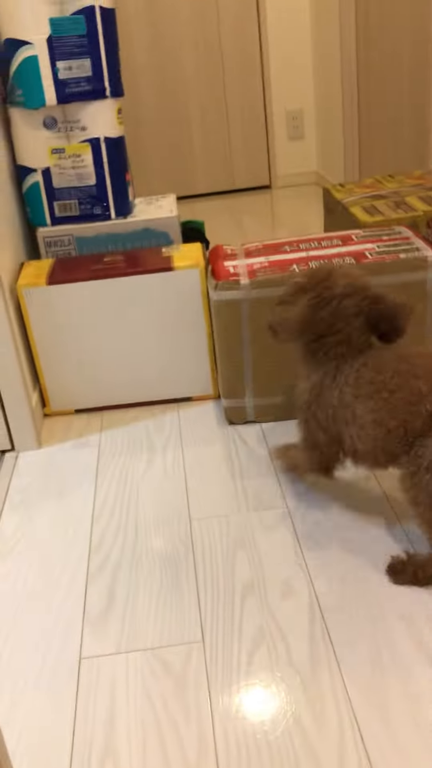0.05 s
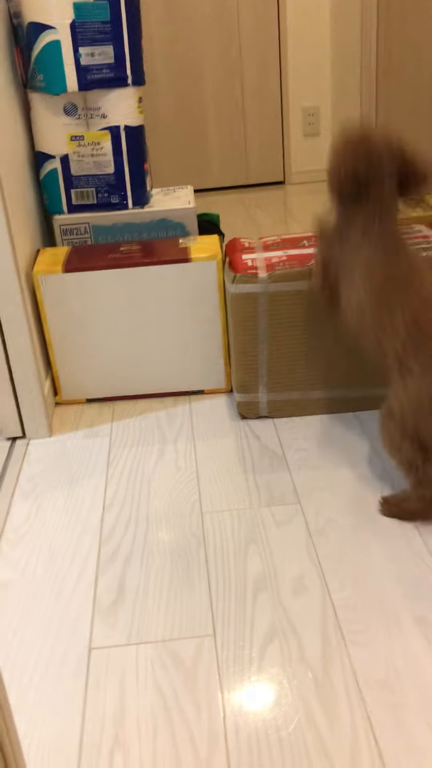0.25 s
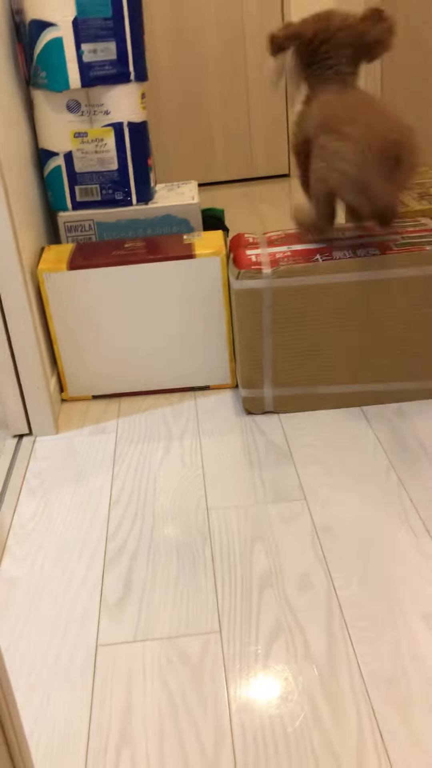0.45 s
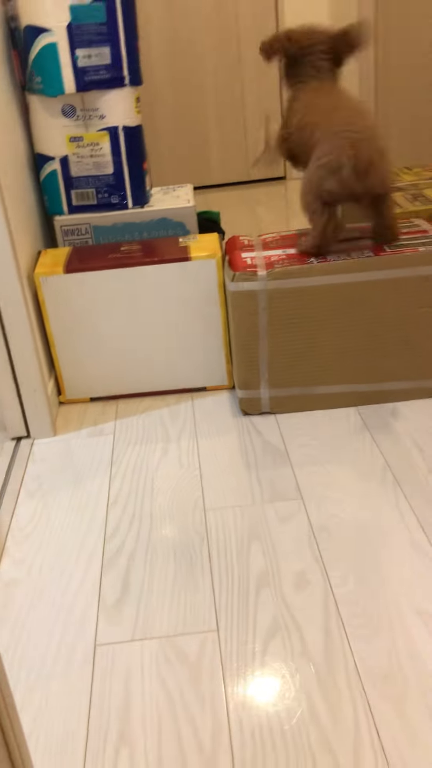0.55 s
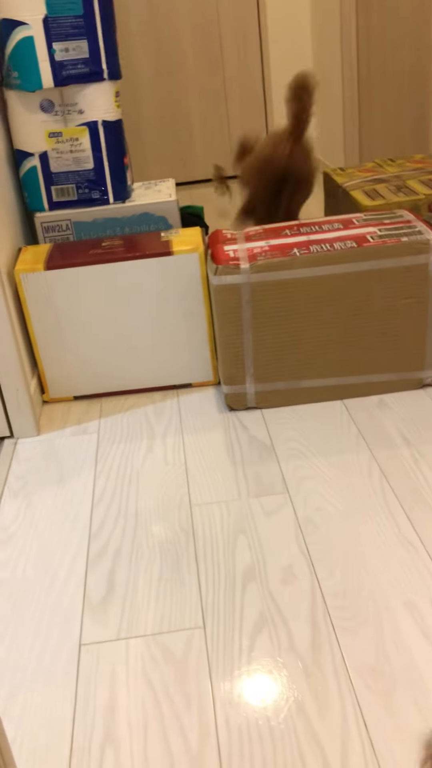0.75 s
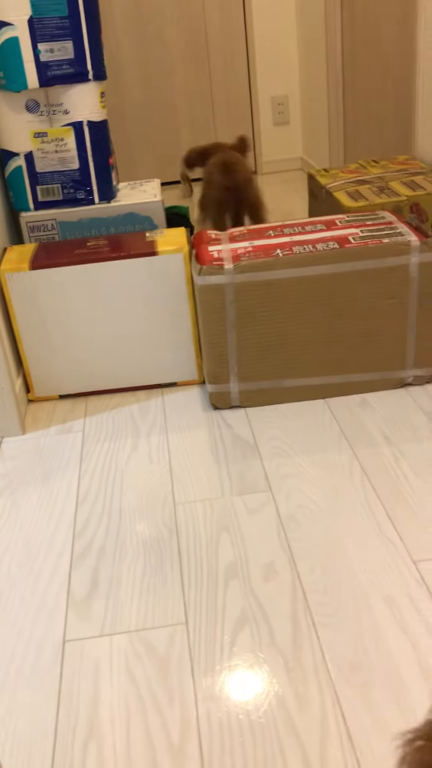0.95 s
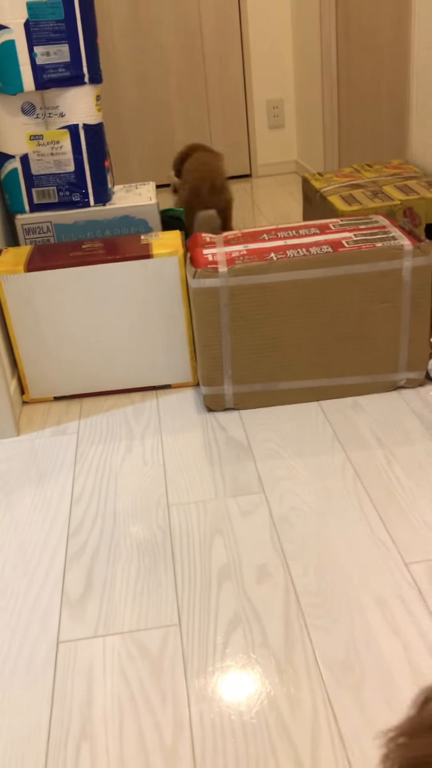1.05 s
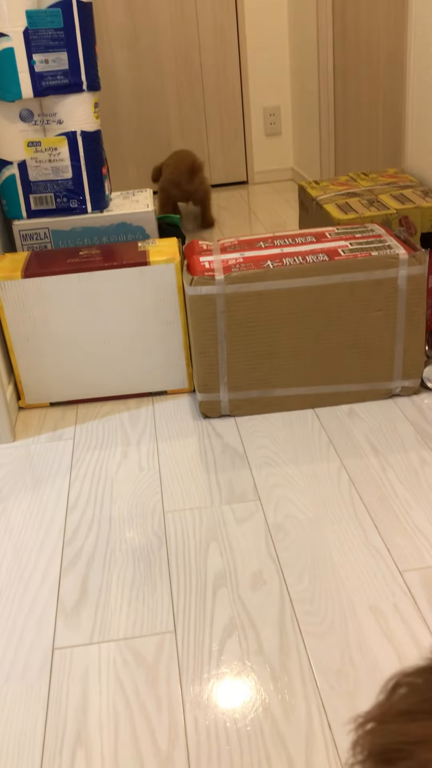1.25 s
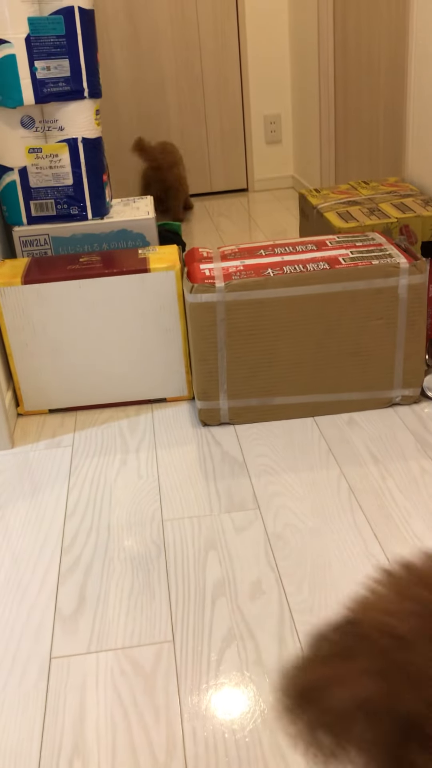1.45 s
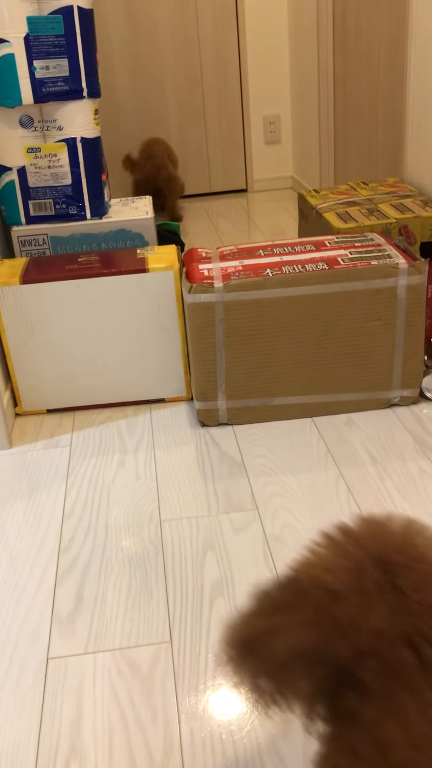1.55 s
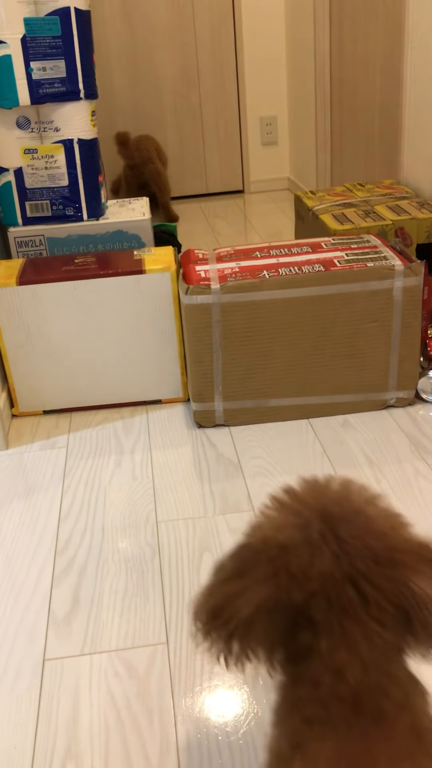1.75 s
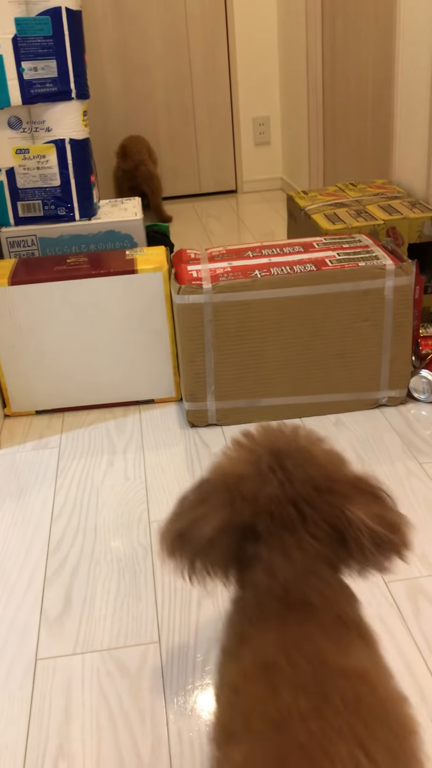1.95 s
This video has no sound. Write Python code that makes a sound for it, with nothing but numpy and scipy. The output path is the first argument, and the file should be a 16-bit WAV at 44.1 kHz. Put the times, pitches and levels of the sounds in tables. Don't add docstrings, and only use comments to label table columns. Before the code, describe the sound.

Near the microphone, claws scrabble and snap on a hard floor; the dog lands on a hollow box, rubs the lid, drops behind and patters off with small scrapes, while faint close ticks end it.

```python
import sys
import numpy as np
from scipy import signal
from scipy.fft import rfft, irfft, next_fast_len
from scipy.io import wavfile
from scipy.ndimage import uniform_filter1d

SR = 44100
rng = np.random.default_rng(int(sys.argv[2]) if len(sys.argv) > 2 else 0)


def nominal_scale(level):
    x = np.asarray(level, float) / 20
    return 10 ** x


def digitize_waveform(pressure):
    field = np.atleast_2d(pressure).T
    bounded = np.clip(field, -1, 1)
    quanta = np.round(bounded * 32767).astype(np.int16)
    wavfile.write(sys.argv[1], SR, quanta)


N = 88200


def evened(x):
    return x / np.sqrt(np.mean(x ** 2) + 1e-20)


def read(points, hz):
    f, value = np.transpose(points)
    return np.interp(np.log(hz + 1), np.log(f + 1), value)


def add(mix, s, sound):
    part = mix[round(s * SR):][:len(sound)]
    part += sound[:len(part)]


def coloured(x, db_of):
    size = next_fast_len(len(x) + 2048)
    gain_db = db_of(abs(np.fft.fftfreq(2048, 1 / SR)))
    log = np.log(nominal_scale(np.maximum(gain_db, -100)))
    taps = np.fft.ifft(np.exp(log - 1j * signal.hilbert(log).imag)).real
    return irfft(rfft(x, size) * rfft(taps, size), size)[:len(x)]


def grit(size, grain_db):
    return rng.standard_normal(size) * nominal_scale(grain_db * np.minimum(rng.exponential(1, size), 4))


# f/Hz, level/dB
AIR = [(30, 7), (65, 4.5), (130, 3.5), (210, -10), (460, -13), (1000, -11.5), (2500, -28.5), (15800, -41.5)]
AIR_DB = -54.5


def room_air():
    hz = np.fft.rfftfreq(N, 1 / SR)
    air = irfft(rfft(rng.standard_normal(N)) * nominal_scale(read(AIR, hz)), N)
    return nominal_scale(AIR_DB) * evened(air)


# f/Hz, width/Hz, level/dB
BOARD_MODES = [(71, 20, -14.5), (140, 80, -6.5), (261, 15, -2), (338, 45, -10)]
# t/s, level/dB
BOARD_SHAKE = [(0, -62), (.12, -52.5), (.3, -46.5), (.4, -40), (.62, -31.5), (.7, -55), (.8, -53.5),
               (1.1, -47), (1.3, -56), (1.45, -58.5), (1.7, -69.5), (2, -56)]


def shaken_boards():
    hz = np.fft.rfftfreq(N, 1 / SR)
    s, db = np.transpose(BOARD_SHAKE)
    modes = sum(nominal_scale(top_db) / (1 + (2 * (hz - f_hz) / width_hz) ** 2) for f_hz, width_hz, top_db in BOARD_MODES)
    shake = rng.standard_normal(N) * nominal_scale(np.interp(np.arange(N) / SR, s, db))
    return irfft(rfft(shake) * modes / np.sqrt(np.mean(modes ** 2)), N)


# f/Hz, t60/s
ROOM_T60 = [(120, 0.97), (500, 0.3), (1400, 0.42), (4000, 0.39), (9000, 0.36), (15000, 0.28)]
EARLY_T60_S, CLUMP_DB = .05, 2


def diffuse(x, early_db):
    hz, t, z = signal.stft(x, SR, nperseg=256, noverlap=192)
    lag = t[:400]
    late = nominal_scale(-120 * lag / read(ROOM_T60, hz)[:, None])
    early = nominal_scale(2 * early_db - 120 * lag / EARLY_T60_S)
    decay = (late + early) / late.sum(1, keepdims=True)
    power = signal.fftconvolve(abs(z) ** 2, decay, axes=1)[:, :len(t)]
    a, b, c = rng.standard_normal((len(t), len(hz), 3)).T
    smooth = uniform_filter1d(uniform_filter1d(c, 5, 0), 8, 1)
    clumps = nominal_scale(CLUMP_DB * evened(smooth))
    tail = np.sqrt(2 * abs(power)) * clumps * (a + 1j * b)
    wet = signal.istft(tail, SR, nperseg=256, noverlap=192)[1]
    return np.r_[np.zeros(160), wet][:N]


FAR_GRAIN_DB, SLIDE_WIDTH_HZ = 3.5, 220
# t/s, f/Hz, level/dB
SLIDE_PATH = [
    (0.999, 4690, -51.5),
    (1.163, 4580, -57.5),
    (1.179, 4340, -40.5),
    (1.3, 4470, -62.5),
    (1.41, 4780, -56),
    (1.499, 5380, -63),
]


def slide():
    s, hz, db = np.transpose(SLIDE_PATH)
    t, r = np.arange(N) / SR, np.exp(-np.pi * SLIDE_WIDTH_HZ / SR)
    turn = np.exp(2j * np.pi * np.cumsum(np.interp(t, s, hz)) / SR)
    envelope = signal.lfilter([1], [1, -2 * r, r * r], grit(N, FAR_GRAIN_DB))
    return evened((turn * envelope).real) * nominal_scale(np.interp(t, s, db, -120, -120))


KNOCK_GRAIN_DB = 4.5
# f/Hz, level/dB
CARD_BODY = [(150, -23), (300, -8), (500, -13.5), (900, -11), (1250, -9), (1700, -13.5), (4200, -19.5),
             (15800, -32.5)]
# t/s, level/dB
LID_DRAG = [
    (.46, -46),
    (0.488, -49),
    (.53, -47),
    (.58, -36),
    (0.619, -34),
    (.65, -60),
    (0.679, -61),
    (.7, -67),
]


def drag():
    s, db = np.transpose(LID_DRAG)
    lumps_db = 1.4 * evened(uniform_filter1d(rng.standard_normal(N), 150))
    rub = evened(coloured(grit(N, KNOCK_GRAIN_DB), lambda hz: read(CARD_BODY, hz)))
    return rub * nominal_scale(np.interp(np.arange(N) / SR, s, db, -120, -120) + lumps_db)


RING_RISE_S, RING_WOBBLE = 0.0026, 0.035
# t/s, level/dB, f/Hz, t60/s
PATCH_RINGS = [(.166, -35, 770, 0.028), (0.3485, -23.5, 1362, 0.08), (.351, -26.5, 2240, 0.039),
               (0.351, -25, 3530, 0.034), (0.352, -37, 4340, 0.028), (.3975, -17, 1180, 0.046),
               (.398, -20, 2260, 0.017), (.3975, -18, 1650, 0.018), (.398, -19, 896, 0.023),
               (0.419, -26, 1290, 0.051), (0.51, -28, 2830, 0.073), (0.536, -18, 1057, 0.028),
               (.543, -24, 700, 0.038), (0.595, -36, 1160, 0.022), (.596, -24, 3510, 0.035),
               (.607, -20, 3120, 0.027), (0.607, -42, 1200, 0.032), (0.298, -16.5, 9630, 0.0096),
               (.299, -25, 6740, 0.01), (1.864, -45, 2630, 0.027), (1.864, -42.5, 4440, 0.018)]


def rings():
    out, t = np.zeros(N), np.arange(4000) / SR
    wobble = uniform_filter1d(rng.standard_normal((len(PATCH_RINGS), len(t))), 100, axis=1) * 10
    for (s, db, hz, t60), flex in zip(PATCH_RINGS, wobble):
        turns = np.cumsum(hz * (1 + RING_WOBBLE * flex)) / SR
        rise = 1 - np.exp(-t / RING_RISE_S)
        add(out, s, nominal_scale(db - 60 * t / t60) * rise * np.sin(2 * np.pi * turns))
    return out


THUMP_RISE_S, THUMP_SAG, SAG_S = .005, .12, .008
# t/s, level/dB, f/Hz, t60/s
WEIGHT_THUMPS = [(0.136, -45, 162.5, 0.3), (0.192, -35, 280, 0.061), (0.401, -15, 176, 0.055),
                 (.556, -37, 180, 0.12), (0.609, -29, 106, 0.042), (0.612, -23, 203, 0.055),
                 (0.622, -30, 264.6, 0.14), (.408, -23, 264, 0.071), (.52, -31.5, 265, 0.11),
                 (.578, -37, 314, 0.057), (.76, -35.5, 127, 0.11), (1.129, -41, 271, 0.096),
                 (0.733, -33.5, 326, 0.1), (.86, -33, 299, 0.058), (.953, -29, 350, 0.043),
                 (1.077, -30.5, 314, 0.044), (1.177, -34, 140, 0.13), (1.302, -39, 153.6, 0.14),
                 (1.625, -43, 266, 0.081)]
# t/s, level/dB, f/Hz, t60/s
LID_LANDINGS = [
    (.358, -12.5, 116, 0.049),
    (.4985, -7.5, 124, .055),
    (.357, -23, 292, 0.046),
    (0.62, -24, 93, 0.082),
]


def thumps():
    out, t = np.zeros(N), np.arange(12000) / SR
    for s, db, hz, t60 in WEIGHT_THUMPS + LID_LANDINGS:
        turns = np.cumsum(hz * (1 + THUMP_SAG * np.exp(-t / SAG_S))) / SR
        rise = 1 - np.exp(-t / THUMP_RISE_S)
        add(out, s, nominal_scale(db + 4.5 - 60 * t / t60) * rise * np.sin(2 * np.pi * turns))
    return out


SNAP_S, RING_DB = 0.000073, -2.5
THIN = 0.87


def contacts(rows, body, q, swell, pivot_hz, grain_db):
    out, t = np.zeros(N), np.arange(4000) / SR
    for s, db, ring_hz, length_s, tilt_db in rows:
        u = t / max(length_s, .0002)
        if swell:
            shape = u * np.exp(1 - u)
        else:
            shape = (1 - np.exp(-t / SNAP_S)) * np.exp(-u ** 1.5 / 2)

        def colour(hz):
            ring = nominal_scale(RING_DB) * q / np.sqrt(1 + (2 * q * (hz / ring_hz - 1)) ** 2) / 2
            octaves = np.log2((hz + 50) / pivot_hz)
            slope_db = tilt_db + THIN * max(tilt_db, 0) * (octaves < 0)
            return read(body, hz) + slope_db * octaves + 20 * np.log10(1 + ring)

        burst = coloured(grit(len(t), grain_db) * shape, colour)
        level = np.sqrt((shape ** 2).sum() / (burst ** 2).sum())
        add(out, s, nominal_scale(db - 11.5) * burst * level)
    return out


CLAW_Q, KNOCK_Q = 9, 5
# f/Hz, level/dB
CLAW_BODY = [(200, -41.5), (650, -7.5), (1000, -7), (3000, -3), (6500, -4), (10000, -1), (15800, -3)]
# t/s, level/dB, f/Hz, length/s, tilt/(dB/oct)
FAR_STEPS = [(.7375, -23, 6560, 0.0033, 1), (.757, -28, 5250, 0.0027, -5.5), (.945, -33, 12100, 0.0054, -3),
             (.9965, -22, 7150, 0.005, 1), (1.025, -36, 5100, 0.027, 3), (1.06, -34, 9100, 0.016, -2.1),
             (1.1175, -26, 6500, 0.0059, 2), (1.17, -22.5, 8670, 0.0032, -1.5),
             (1.27, -36.5, 4600, 0.0089, 0), (1.304, -31, 5200, 0.005, 2), (1.358, -27, 7700, 0.0059, -0.5),
             (1.5605, -38, 6620, 0.002, -4), (1.575, -48, 4300, 0.011, -2),
             (1.618, -26.5, 4030, 0.0017, -1.1), (1.627, -36.5, 3420, 0.0021, -9)]
# t/s, level/dB, f/Hz, length/s, tilt/(dB/oct)
FAR_SCRAPES = [
    (.77, -40, 2970, 0.016, -1.5),
    (.88, -52, 3180, 0.013, -3),
    (.955, -39, 4750, 0.01, -2),
    (1.175, -22.5, 6240, 0.0037, 0),
    (1.2, -37, 6860, 0.007, -2),
    (1.385, -35, 5040, 0.0052, -0.5),
    (1.42, -44, 5400, 0.0073, -2.5),
    (1.45, -49, 5540, 0.0087, -4),
    (1.46, -54, 3035, 0.014, -3.5),
    (1.595, -46, 4400, 0.0065, -8.5),
]


def far_claws():
    steps = contacts(FAR_STEPS, CLAW_BODY, CLAW_Q, True, 6000, FAR_GRAIN_DB)
    return steps + contacts(FAR_SCRAPES, CLAW_BODY, KNOCK_Q, True, 6000, FAR_GRAIN_DB)


# t/s, level/dB, f/Hz, length/s, tilt/(dB/oct)
PAW_KNOCKS = [(.055, -34.5, 1285, 0.029, 0), (.132, -28, 725, 0.0068, -4), (.15, -30, 690, 0.021, 1.3),
              (.164, -34.5, 790, 0.04, -1.5), (.3497, -17.5, 2900, 0.0088, -0.5),
              (.397, -14, 1930, 0.0057, -1), (.42, -28, 1290, 0.01, 1.5), (.492, -17, 2430, 0.007, 1),
              (.511, -22, 3260, 0.013, 0.5), (.536, -16, 3830, 0.0061, 0),
              (.548, -20.5, 3040, 0.0078, -1.5), (.593, -18.5, 1060, 0.0063, 6.5),
              (.622, -25, 4100, 0.011, 2.5), (.737, -26.5, 447, 0.019, -5), (.858, -33, 456, 0.017, -5),
              (1.004, -26.5, 1110, 0.0038, -5), (1.129, -33, 3160, 0.011, -1.5),
              (1.302, -34, 515, 0.019, -5), (1.356, -32.5, 865, 0.016, 1), (1.619, -36.5, 2360, 0.018, 2)]


def knocks():
    return contacts(PAW_KNOCKS, CARD_BODY, KNOCK_Q, False, 1500, KNOCK_GRAIN_DB)


# t/s, level/dB, f/Hz, length/s, tilt/(dB/oct)
NEAR_SKIDS = [
    (0, -47, 6100, 0.014, -3.3),
    (.033, -35, 2970, 0.005, -1),
    (.047, -25.5, 6520, 0.0067, -1.5),
    (.058, -32, 6500, 0.004, -11),
    (.488, -17.5, 6060, 0.0017, -4),
    (.5915, -21.5, 7500, 0.0024, 1.5),
    (.6168, -21.5, 7160, 0.004, 11),
]


def skids():
    return contacts(NEAR_SKIDS, CLAW_BODY, CLAW_Q, True, 6000, FAR_GRAIN_DB)


# t/s, level/dB, f/Hz, length/s, tilt/(dB/oct)
NEAR_TICKS = [(.1305, -30, 6440, 0.0086, -4.5), (.1368, -17.5, 9350, 0.002, 0.2),
              (.159, -31, 12600, 0.0018, -4), (.1945, -25, 11400, 0.0033, -0.5),
              (.2252, -5, 8800, 0.001, -1), (.2278, -6.5, 1500, 0.002, -1),
              (.2396, -9.5, 5860, 0.0017, -3.5), (.2416, -1.5, 8500, 0.001, -2.5),
              (.2958, -6.5, 9400, 0.0016, -1.5), (.2995, -15, 6300, 0.0046, -5),
              (.3115, -19, 13500, 0.00091, -24), (.4826, -17, 11100, 0.004, -2),
              (.8245, -26, 9200, 0.0059, 12), (.9272, -31.5, 7060, 0.0058, -0.5),
              (1.733, -41, 10200, .002, 2), (1.741, -42, 9900, 0.006, -5),
              (1.7575, -39.5, 4700, 0.014, 0.2), (1.8255, -40, 12000, 0.0015, -2),
              (1.8525, -40, 6750, .0012, -2), (1.8645, -32, 6700, 0.0014, 1)]
# t/s, level/dB, f/Hz, length/s, tilt/(dB/oct)
TIP_SNAPS = [
    (.2257, 4, 8500, 0.00028, 2.5),
    (.2265, 2.5, 6100, 0.00032, 0.5),
    (.2393, -0.5, 6100, 0.00039, 2.5),
    (.2428, -4, 6000, 0.00071, 0.5),
    (.2465, -19, 6000, 0.0026, 2.5),
    (.209, -36, 7160, 0.0032, -5.5),
    (.4875, -15, 9100, .003, -6),
]


def ticks():
    clicks = contacts(NEAR_TICKS, CLAW_BODY, CLAW_Q, False, 6000, 6.5)
    return clicks + contacts(TIP_SNAPS, CLAW_BODY, CLAW_Q, False, 6000, FAR_GRAIN_DB)


TICK_WET_DB, SKID_WET_DB, FAR_WET_DB = -8, -6, 3.5
KNOCK_WET_DB, RING_WET_DB, THUMP_WET_DB = 0, -3.5, -10.5
THUMP_CUT_HZ = 68


def scene():
    tick, skid, far = ticks(), skids(), far_claws()
    knock, ring, low = knocks() + drag(), rings(), thumps()
    near_send = nominal_scale(TICK_WET_DB) * tick + nominal_scale(SKID_WET_DB) * skid
    far_send = nominal_scale(FAR_WET_DB) * far + nominal_scale(KNOCK_WET_DB) * knock + nominal_scale(RING_WET_DB) * ring
    near_wet, far_wet = diffuse(near_send, 6), diffuse(far_send, 0.5)
    low_cut = signal.butter(4, THUMP_CUT_HZ, "high", fs=SR, output="sos")
    low_wet = signal.sosfilt(low_cut, diffuse(nominal_scale(THUMP_WET_DB) * low, 2.5))
    direct = tick + skid + far + knock + ring + low
    background = room_air() + shaken_boards() + slide()
    return (direct + near_wet + far_wet + low_wet + background)[None]


def roll_off(x):
    return signal.sosfilt(signal.butter(12, 17110, fs=SR, output="sos"), x)


# f/Hz, width/Hz, level/dB
MIC_PORT = [(4500, 600, 5), (6800, 900, 6), (8900, 800, 4), (10600, 700, -6), (12300, 900, 2)]
EDGE_HZ, EDGE_DB, LOW_CUT_HZ = 15900, -37, 55


def record(dry):
    def microphone(hz):
        port_db = sum(db / (1 + (2 * (hz - f) / w) ** 2) for f, w, db in MIC_PORT)
        return port_db + EDGE_DB / (1 + np.exp((EDGE_HZ - hz) / 60))

    x = coloured(dry[0], microphone)
    x = signal.sosfilt(signal.butter(2, LOW_CUT_HZ, "high", fs=SR, output="sos"), x)
    return roll_off(x[None])


dry = scene()
out = record(dry)
digitize_waveform(out)
```